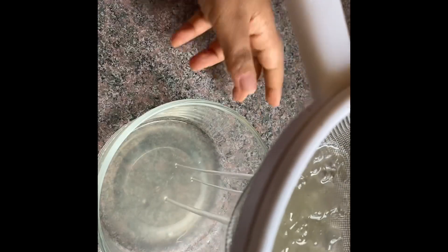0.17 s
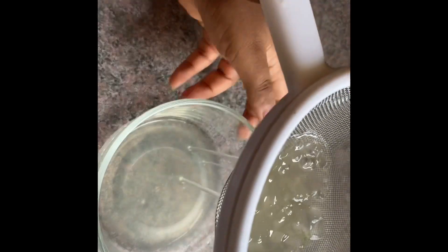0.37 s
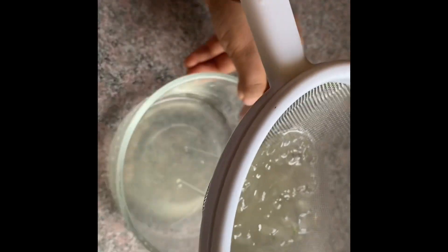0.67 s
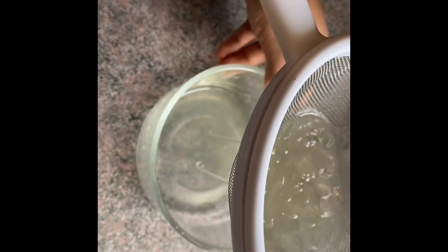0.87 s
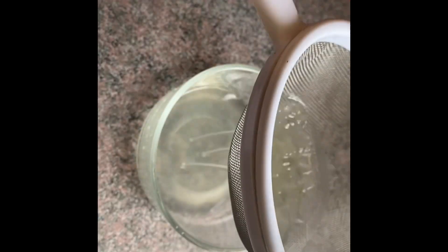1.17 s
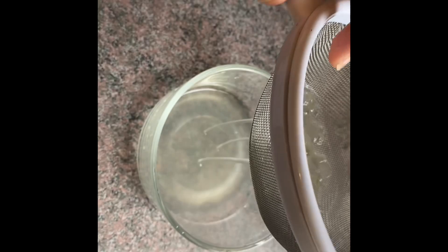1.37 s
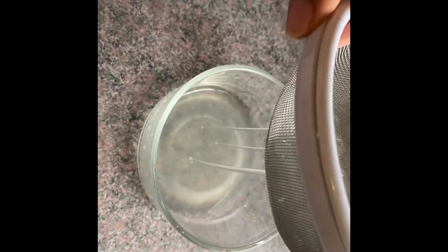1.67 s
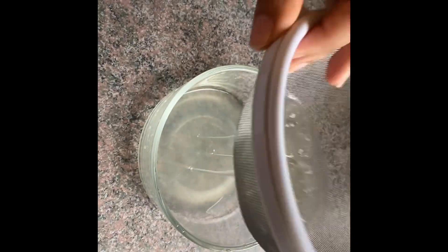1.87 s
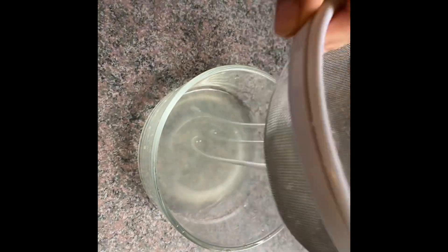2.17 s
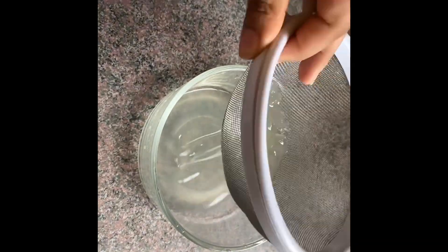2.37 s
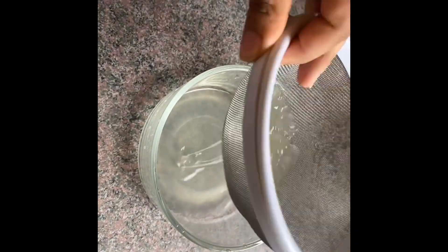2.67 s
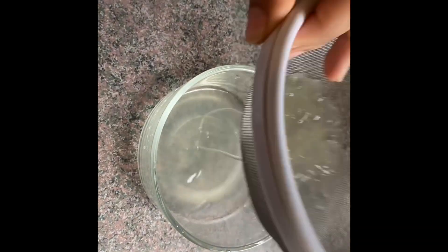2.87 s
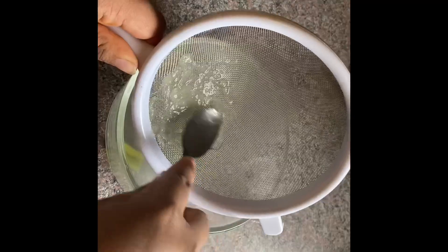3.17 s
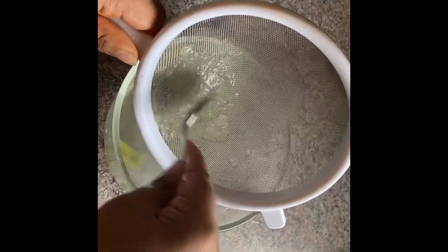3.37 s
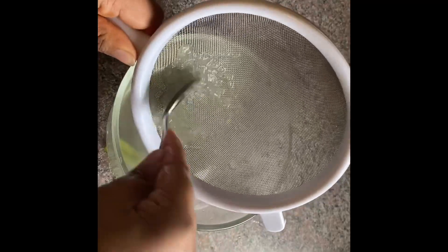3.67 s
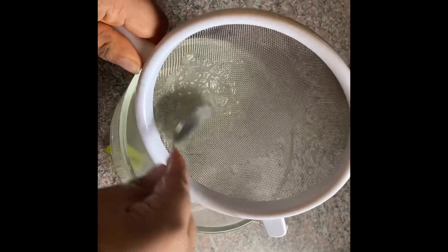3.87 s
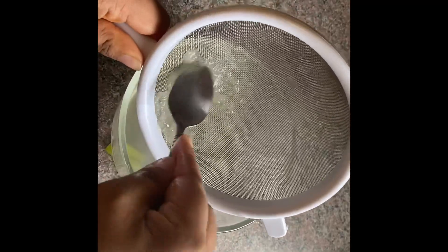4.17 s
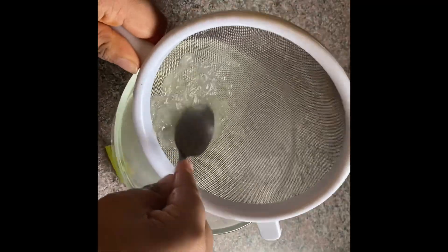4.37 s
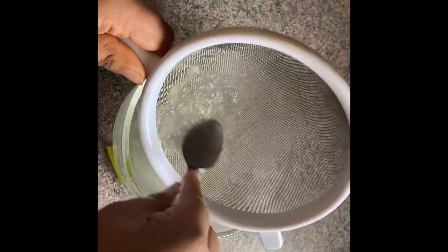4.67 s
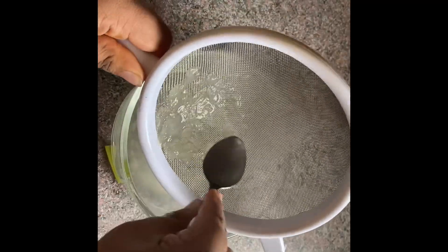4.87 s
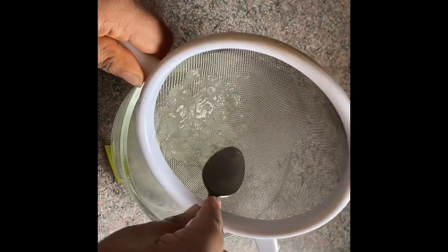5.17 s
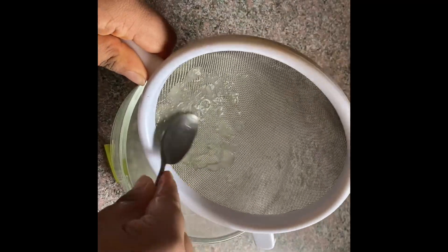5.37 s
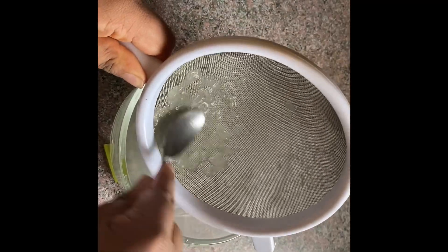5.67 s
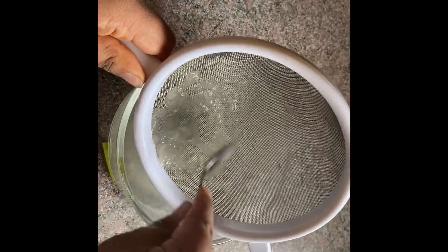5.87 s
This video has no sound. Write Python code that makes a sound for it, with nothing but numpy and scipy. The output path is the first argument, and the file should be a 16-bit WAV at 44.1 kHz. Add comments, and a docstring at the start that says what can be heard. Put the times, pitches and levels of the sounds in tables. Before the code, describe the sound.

A small kitchen heard close in stereo, with quiet room tone and a steady, slightly wavering low motor hum. At about 0.2 s there is a faint high glass clink; from 0.5 to 0.8 s a glass bowl slides on a stone counter, a short gritty hiss with a low droning scrape. Then mostly hum, with a barely audible bright rustle near 2 s. At 3.05 s the sound cuts to a closer view with a deeper hum. A steel spoon rasps over wire mesh in short, bright, scratchy strokes with sharp ticks at 3.1, 3.2 and 3.4 s, then lighter ones around 3.8-4.0. A busier cluster at 4.1-4.6 s includes the loudest event, a hard hollow rim knock on the bowl at 4.48, and another tick and bump around 4.6-4.7. Softer scrapes and ticks continue from 4.9 to 5.7; a sharper tick and rasp come near 5.9, then a last swelling scrape.

```python
"""A steel spoon rasps over a strainer's wire mesh in short strokes (random wire slips, coloured and rung),
ticks on the wires (noise cracks) and knocks the plastic rim on a glass bowl (decaying frame modes).
Before a cut to this closer view, the bowl slides on a stone counter (random grit clicks) with a faint clink
and a soft rustle (noise). A motor hums (wobbling sines) in both views. Two close microphone ports hear it
in a small kitchen, with a noise room tail and room tone."""
import sys
import numpy as np
from scipy import signal
from scipy.fft import rfft, irfft, next_fast_len
from scipy.io import wavfile
from scipy.ndimage import uniform_filter1d

SR = 44100
rng = np.random.default_rng(int(sys.argv[2]) if len(sys.argv) > 2 else 0)


def dump_mix(stems):
    """Bounce the given channels to the path in sys.argv[1] as a 16-bit WAV at rate SR."""
    frames = np.atleast_2d(stems).T  # one column per channel
    limited = np.clip(frames, -1, 1)  # hard clip at full scale
    pcm = np.round(limited * 32767).astype(np.int16)
    wavfile.write(sys.argv[1], SR, pcm)


def amplitude_ratio(level_db):
    """Convert a level in decibels to the matching linear amplitude (field) ratio."""
    exponent = np.asarray(level_db, float) / 20
    return 10 ** exponent


N = 265570


def rms_one(x):
    """Scale to rms 1."""
    return x / np.sqrt(np.mean(x ** 2) + 1e-20)


def band(x, edges_hz):
    """Band-pass; rms 1."""
    sos = signal.butter(2, edges_hz, "band", fs=SR, output="sos")
    return rms_one(signal.sosfilt(sos, x))


def on_grid(points, size):
    """Columns of a frequency table, interpolated over log frequency on an FFT grid."""
    hz, *columns = np.transpose(points)
    log_hz = np.log(np.maximum(np.arange(size // 2 + 1) * SR / size, 1))
    return [np.interp(log_hz, np.log(hz), c) for c in columns]


def colour(x, points):
    """Filter x by a spectrum table; rms 1."""
    size = next_fast_len(N)
    gain = amplitude_ratio(on_grid(points, size)[0])
    return rms_one(irfft(rfft(x, size) * gain, size)[:N])


def in_time(tables, columns):
    """A gain curve for the level column and for each column above it, silent between tables."""
    t, out = np.arange(N) / SR, np.zeros((columns, N))
    for rows in tables:
        s, db, *above = np.transpose(rows)
        for gain, rel_db in zip(out, [0] + above):
            gain += amplitude_ratio(np.interp(t, s, db + rel_db, left=-150, right=-150))
    return uniform_filter1d(out, size=90, axis=1)


def drift(rate_hz):
    """Slow chance, spread 1: noise through two equal poles, drawn every 40 samples."""
    r = np.exp(-2 * np.pi * rate_hz * 40 / SR)
    noise = rng.standard_normal(N // 40 + 2002)
    slow = signal.lfilter([1], [1, -2 * r, r * r], noise)[2000:]
    return np.interp(np.arange(N) / 40, np.arange(len(slow)), rms_one(slow))


def ring(clicks, hz, t60_s):
    """A two-pole resonator: a unit click sets a sine of height 1 ringing."""
    r, w = amplitude_ratio(-60 / (t60_s * SR)), 2 * np.pi * hz / SR
    return signal.lfilter([0, np.sin(w)], [1, -2 * r * np.cos(w), r * r], clicks + 1e-18)


def strike(modes, times_s, db, spread_db):
    """Blows on one body, each mode with a new strength per blow."""
    out, at = np.zeros(N), (np.asarray(times_s) * SR).astype(int)
    chance = rng.standard_normal((len(at), len(modes)))
    for k, (hz, mode_db, t60_s) in enumerate(modes):
        clicks = np.zeros(N)
        clicks[at] = amplitude_ratio(db + mode_db + spread_db * chance[:, k])
        out += ring(clicks, hz, t60_s)
    return out


def slips(per_s, size_db):
    """Random clicks of uneven size and either sign."""
    sizes = amplitude_ratio(size_db * np.minimum(rng.exponential(1, N), 5)) * rng.choice([-1, 1], N)
    return sizes * (rng.random(N) < per_s / SR)


# room tone spectrum per view: (frequency [Hz], relative level [dB])
AIR = [
    [(25, -68), (51, -19.5), (86, -28), (118, -12), (271, -25), (480, -20.5), (1000, -27), (1400, -29.5),
     (1750, -31), (2350, -34.5), (3400, -44), (4600, -53.5), (6000, -57), (9000, -59.5), (12500, -59.5),
     (14500, -78)],
    [(20, -52), (76, -6), (135, -16), (263, -12.5), (497, -20), (620, -25.5), (818, -27.5), (6720, -56.5),
     (15000, -62)],
]
# room tone rms per view, before drift: (level [dB])
AIR_DB = [-55, -53]


def room_tone(view):
    """Coloured noise with a drifting level."""
    return amplitude_ratio(AIR_DB[view] + 1.0 * drift(4.3)) * colour(rng.standard_normal(N), AIR[view])


# motor lines per view: (frequency [Hz], rms before wobble [dB], wobble spread [dB])
MOTOR_LINES = [
    [(119.7, -54, 1), (479.3, -59.5, 3.2), (592, -67, 1.5), (947, -68.5, 2.5), (1421, -71, 4),
     (2256, -76, 2), (2440, -79, 5), (6998, -96, 2), (9135, -100, 5)],
    [(59, -52, 2.5), (248, -57, 2), (465, -64.5, -1)],
]


def motor(view):
    """Steady lines whose level and phase wobble; much wobble blurs a line."""
    t, out = np.arange(N) / SR, np.zeros(N)
    for hz, db, wobble_db in MOTOR_LINES[view]:
        level = np.sqrt(2) * amplitude_ratio(db + wobble_db * drift(9.6))
        phase = 0.26 * wobble_db * drift(8.1)   # rad
        out += level * np.sin(2 * np.pi * hz * t + phase)
    return out


# soft bright rustles: (time [s], length [s], level [dB])
RUSTLES = [(1.99, .03, -74)]


def rustle():
    """Brief Gaussian swells of bright band noise."""
    t = np.arange(N) / SR
    swell = sum(amplitude_ratio(db) * np.exp(-((t - s) / length_s) ** 2) for s, length_s, db in RUSTLES)
    return swell * band(rng.standard_normal(N), [4500, 11700])


# glass sliding on stone, one table per slide: (time [s], hiss level [dB], drone above hiss [dB])
SLIDE = [
    [(.47, -73, 5), (.57, -48.5, -22), (.66, -48.5, -28), (.68, -42, 2), (.765, -46.5, -10.5),
     (.79, -72.5, 25.5), (.84, -79, 1)],
]
# sliding hiss spectrum: (frequency [Hz], relative level [dB])
GLASS_HISS = [(600, -9), (1000, 1), (1300, -6.5), (2900, -13.5), (3800, -15), (4800, -24), (8500, -30),
              (10400, -29), (12000, -35), (14600, -39)]
# bowl drone resonances: (frequency [Hz], width [Hz])
BOWL_DRONE = [(450, 37), (620, 85), (930, 31)]
# faint far clinks: (time [s], frequency [Hz], level [dB], t60 [s])
CLINKS = [(.176, 4685, -66, 0.2)]


def bowl():
    """Grit under the glass hisses and drives the bowl's low drone; one faint clink."""
    hiss_gain, drone_gain = in_time(SLIDE, columns=2)
    grit = slips(per_s=19000.0, size_db=3.5) * amplitude_ratio(1.3 * drift(37.0))
    drone = rms_one(sum(ring(grit, hz, 18.0 / width_hz) for hz, width_hz in BOWL_DRONE))
    clinks = sum(strike([(hz, db, t60_s)], [s], 0, 0) for s, hz, db, t60_s in CLINKS)
    return hiss_gain * colour(grit, GLASS_HISS) + drone_gain * drone + clinks


# strainer frame modes: (frequency [Hz], level [dB], t60 when knocked [s])
FRAME_MODES = [(93.4, -5, 0.17), (211.7, -10.5, 0.24), (257, -17.5, 0.17), (294, -9.5, 0.13),
               (369.2, -9, 0.16), (427, -6.5, 0.037), (492.6, -5.5, 0.11), (640, -7.5, 0.021),
               (698, -5, 0.068), (778, 2.5, 0.014), (944, -5, 0.039), (1174, -3.5, 0.033),
               (1340, -12, 0.02), (1653, -9.5, 0.023)]
# rim knocks and bumps on the bowl: (time [s], level [dB], favoured frequency [Hz], reach [octaves])
KNOCKS = [(3.117, -34, 330, 0.49), (3.202, -29.5, 390, 0.59), (3.413, -37.5, 480, .4),
          (3.44, -31, 200, 0.42), (3.772, -32, 500, 0.24), (3.806, -30, 100, 0.77),
          (3.904, -28.5, 350, 0.44), (4.247, -32.5, 400, 0.82), (4.27, -27.5, 370, 0.49),
          (4.345, -32.5, 110, 0.53), (4.4787, -5, 676, 1.83), (4.484, -16, 220, 1.3),
          (4.675, -20.5, 330, 1.22), (4.701, -28, 100, .4), (5.178, -31, 330, 0.59), (5.205, -27, 100, .4),
          (5.773, -40, 200, 1.5), (5.862, -39.5, 400, .6), (5.942, -25.5, 290, 0.23)]
RISE_CYCLES = 0.31   # time constant of a mode's onset
CHATTER_S, CHATTER_LOSS_DB = 0.012, 8   # mean gap and loss per repeat touch


def knocks():
    """Each blow rings frame modes near the pitch its place on the rim favours, then touches three more times."""
    out, t = np.zeros(N + SR), np.arange(SR // 3) / SR
    hz, mode_db, t60_s = np.transpose(FRAME_MODES)[:, :, None]
    sign = (-1.) ** np.arange(len(FRAME_MODES))[:, None]
    chance_db = 1.1 * rng.standard_normal((len(KNOCKS), len(FRAME_MODES), 1))
    gaps = rng.uniform(.5, 1.5, size=(len(KNOCKS), 4))
    onset = 1 - np.exp(-t * hz / RISE_CYCLES)   # low modes build up later
    for (s, db, centre_hz, reach_oct), luck_db, gap in zip(KNOCKS, chance_db, gaps):
        favour = np.exp(-.5 * (np.log2(hz / centre_hz) / reach_oct) ** 2)
        gain = amplitude_ratio(db + mode_db + luck_db - 60 * t / t60_s) * favour
        blow = np.sum(sign * gain * np.sin(2 * np.pi * hz * t) * onset, axis=0)
        for k, late in enumerate(np.cumsum(gap) - gap[0]):
            at = int((s + CHATTER_S * late) * SR)
            out[at:at + len(t)] += amplitude_ratio(-CHATTER_LOSS_DB * k) * blow
    return out[:N]


# colour of one wire slipping: (frequency [Hz], relative level [dB])
MESH_COLOUR = [(500, -37.5), (900, -19.5), (1700, -17.5), (2800, -8.5), (3600, -3), (4200, 5), (5000, -2),
               (7000, 2), (9000, 2), (12000, -4.5), (15600, -17.5), (16200, -65)]
# spoon bowl modes: (frequency [Hz], level [dB], t60 [s])
SPOON_MODES = [(1029, -4, 0.34), (2347, -12, 0.27), (2410, -15, .14), (2864, -8, 0.17), (4037, -8, .18),
               (4270, -11, 0.06)]
# spoon ticks: (time [s], crack level [dB], steel ring above crack [dB])
TICKS = [(3.073, -37, -25), (3.17, -33, -36), (3.1998, -25, -13), (3.4122, -27, -23), (3.771, -35, -12.5),
         (3.828, -43, -31), (3.883, -44.5, -15), (3.902, -33, -11.5), (3.997, -42, -9), (4.12, -59.5, 0),
         (4.143, -42, -20), (4.215, -35.5, -38), (4.2447, -32, -7.5), (4.282, -38, -33),
         (4.3177, -33.5, -6), (4.331, -44, -22), (4.35, -32.5, -35), (4.4794, -23.5, -22),
         (4.532, -31, -33), (4.612, -21, -18.5), (4.8619, -31.5, -20), (4.875, -43, -36), (4.979, -47, -43),
         (4.987, -29, -45), (5.008, -32.5, -29), (5.175, -33, -13), (5.446, -46.5, -17),
         (5.618, -41.5, -27), (5.707, -49.5, -8.5), (5.771, -40.5, -15), (5.8655, -25.5, -42),
         (5.984, -39.5, -25)]


def ticks():
    """A crack decaying 60 dB in 11 ms in the mesh colour, fuller below, and a ring of the steel."""
    s, db, ring_db = np.transpose(TICKS)
    marks = np.zeros(N)
    marks[(s * SR).astype(int)] = amplitude_ratio(db)
    fade = amplitude_ratio(-60 / (0.011 * SR))
    envelope = signal.lfilter([1], [1, -fade], marks + 1e-18)
    bright = colour(rng.standard_normal(N), MESH_COLOUR)
    body = band(rng.standard_normal(N), [796, 4670])
    return envelope * rms_one(bright + body) + strike(SPOON_MODES, s, db + ring_db, 2)


# spoon strokes: (start [s], length [s], rasp level at the end [dB], swell from start to end [dB],
# mesh belly above the rasp [dB])
STROKES = [(3.046, 0.07, -38.5, 4, -21), (3.158, 0.011, -33, 0.5, -27), (3.408, 0.075, -31, 17.5, -48),
           (3.503, 0.042, -67, -18, -34), (3.753, 0.047, -41.5, 10, -17), (3.845, 0.043, -55.5, -6, -6),
           (3.903, 0.0059, -54, 1, 5.5), (4.15, 0.022, -38, 14.5, -21), (4.217, 0.017, -46.5, -12.5, -1.5),
           (4.28, 0.014, -56, -19, -4.5), (4.311, 0.022, -41.5, 3, -8.5), (4.335, 0.0094, -46, 3.5, 6.5),
           (4.482, 0.043, -46, -6, 14), (4.607, 0.039, -30, -4, 1), (4.862, 0.016, -60, -11.5, 7),
           (4.977, 0.034, -45, -4.5, 4), (5.165, 0.07, -43.5, 13, -0.5), (5.234, 0.049, -49, 10, -2.5),
           (5.309, 0.0087, -42, 10, -8.5), (5.449, 0.015, -65.5, -10, -12), (5.523, 0.033, -58, 12, -25),
           (5.585, 0.0068, -49.5, -2, -29), (5.619, 0.029, -46.5, -8, -6.5), (5.866, 0.0051, -46, -4, -5.5),
           (5.889, 0.036, -31, 4, -33), (5.968, 0.13, -49, 10.5, -1)]
LAND_S, LAND_DB = 0.006, 11   # bite time, also the shortest stroke; rise while biting
LIFT_DB_PER_S = 616.5


def stroke_curves():
    """Each stroke lands, swells or sags evenly and lifts off at a steady rate."""
    curves = []
    for s, length_s, db, swell_db, belly_db in STROKES:
        end_s = s + max(length_s, LAND_S)
        curves.append([(s - LAND_S / 2, db - swell_db - LAND_DB, belly_db),
                       (s + LAND_S / 2, db - swell_db, belly_db),
                       (end_s, db, belly_db),
                       (end_s + .1, db - .1 * LIFT_DB_PER_S, belly_db)])
    return curves


BELLY_HZ, RUMBLE_HZ = [722, 1626], [72.3, 520]   # band edges
RUMBLE_DB, RUMBLE_FOLLOWS = -30.5, 0.41   # frame rumble at a rasp of 0 dB; share of the rasp's dB swing


def frame_rumble(wires):
    """Wire slips ring the low frame modes, each drifting in level; rms 1."""
    out = np.zeros(N)
    for hz, db, t60_s in FRAME_MODES:
        if hz < 2 * RUMBLE_HZ[1]:
            out += amplitude_ratio(db + 3.8 * drift(3.4)) * ring(wires, hz, 0.72 * t60_s)   # shorter than when knocked
    return band(out, RUMBLE_HZ)


def spoon():
    """Wires slip under the spoon in clumps; the slips shake mesh belly and frame and faintly ring the steel."""
    rasp_gain, belly_gain = in_time(stroke_curves(), columns=2)
    wires = slips(per_s=3000., size_db=3) * amplitude_ratio(2.8 * drift(110))
    snaps = amplitude_ratio(7) * slips(per_s=200, size_db=1.8)   # lone wires catch and snap harder
    both = wires + snaps
    zing = np.zeros(N)
    for hz in np.geomspace(1700, 5600, 9):   # wire spans ring by turns
        zing += amplitude_ratio(4.5 * drift(18)) * rms_one(ring(both, hz, 25 / hz))
    mesh = rasp_gain * rms_one(colour(both, MESH_COLOUR) + amplitude_ratio(-6) * rms_one(zing))
    belly = belly_gain * band(both, BELLY_HZ)
    # the frame is slow to start and stop
    rumble_gain = uniform_filter1d(amplitude_ratio(RUMBLE_DB) * rasp_gain ** RUMBLE_FOLLOWS, size=900)
    steel = sum(amplitude_ratio(db) * ring(mesh, hz, t60_s) for hz, db, t60_s in SPOON_MODES)
    return mesh + belly + rumble_gain * frame_rumble(wires) + amplitude_ratio(-50.5) * steel


# microphone ports per view: (frequency [Hz], left over right [dB], left leads [rad], likeness [0-1])
PORTS = [
    [(150, 0, 0, 1), (400, 4, 0, .92), (690, 7, -.1, .75), (950, 7, -1, .3), (1300, 6, -2.3, .55),
     (2200, 2, -2.3, .3), (9000, -1, .5, .2), (14000, 0, 3, .8)],
    [(80, 0, 0, 1), (200, 4, 0, .93), (500, 7, -.6, .8), (750, 7, -1.1, .7), (1050, 0, -1.4, .7),
     (1450, -1, -.1, .92), (2100, 0, .1, .98), (2800, -3, .1, .8), (4300, -3, .9, .6), (6900, 0, 2.2, .8),
     (7700, 0, 3.1, .995), (11800, 0, 3.18, .995), (13800, 0, 4, .6), (15500, 0, 5.4, .7)],
]
ROOM_T60_S, ROOM_DB, WALL_CUT_HZ = 0.25, -12.5, 15000


def heard(near, view):
    """Ports share part of the room tail and tone; scatter off nearby things reaches them in opposite phase."""
    size, t = next_fast_len(N + SR // 2), np.arange(SR // 2) / SR
    dull = np.exp(-2 * np.pi * WALL_CUT_HZ / SR)
    tail = signal.lfilter([1], [1, -dull], rng.standard_normal((3, len(t))))   # shared, left, right
    tail = tail * amplitude_ratio(-60 * t / ROOM_T60_S) * (t > .004)
    tail = rfft(tail / np.linalg.norm(tail, axis=1, keepdims=True), size)
    scatter = rng.standard_normal(len(t)) * amplitude_ratio(-60 * t / .02)
    scatter = rfft(scatter / np.linalg.norm(scatter), size)
    tone = rfft([room_tone(view) for path in tail], size)
    source = rfft(near, size)
    shared, *own = source * amplitude_ratio(ROOM_DB) * tail + tone
    balance_db, lead_rad, alike = on_grid(PORTS[view], size)
    side = np.array([[.5], [-.5]])
    direct = source * (np.sqrt((1 + alike) / 2) + np.sqrt(2 - 2 * alike) * side * scatter)
    hum = rfft(motor(view), size)
    diffuse = np.sqrt(alike) * shared + np.sqrt(1 - alike) * np.array(own)
    port_gain = amplitude_ratio(side * balance_db) * np.exp(1j * side * lead_rad)
    return irfft(port_gain * (direct + hum + diffuse), size)[:, :N]


CUT_S, FADE_S = 3.052, 0.018


def scene():
    """The wide view fades out just before the cut, the close view fades in just after."""
    t = np.arange(N) / SR
    wide = heard(bowl() + rustle(), view=0)
    close = heard(knocks() + ticks() + spoon(), view=1)
    fade_out, fade_in = np.clip((CUT_S - t) / FADE_S, 0, 1), np.clip((t - CUT_S) / FADE_S, 0, 1)
    return wide * fade_out + close * fade_in


def roll_off(x):
    """The treble ends steeply here."""
    return signal.sosfilt(signal.butter(12, 16600, fs=SR, output="sos"), x)


def record(dry):
    """The microphone rounds the highest peaks and drops the deepest bass."""
    ceiling = 1.1
    rounded = ceiling * np.tanh(dry / ceiling)
    mix = signal.sosfilt(signal.butter(3, 50, "high", fs=SR, output="sos"), rounded)
    return roll_off(mix)


dry = scene()
out = record(dry)
dump_mix(out)
```